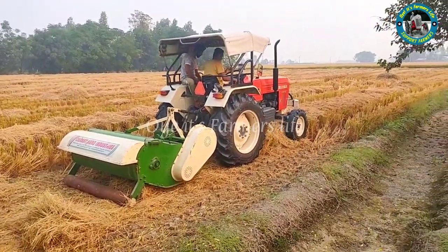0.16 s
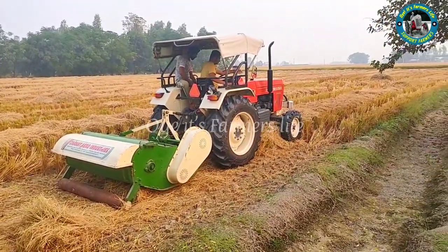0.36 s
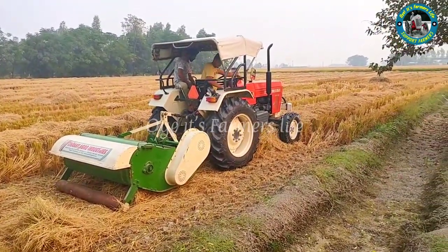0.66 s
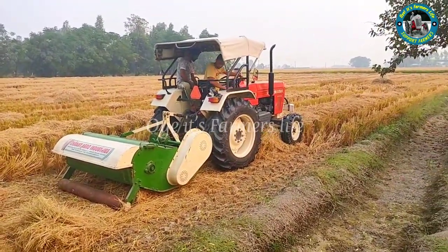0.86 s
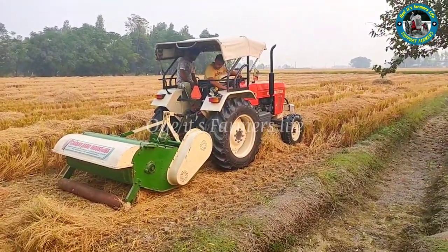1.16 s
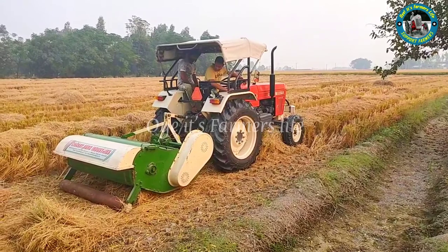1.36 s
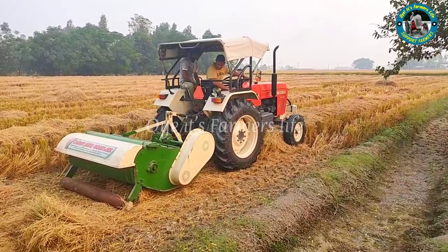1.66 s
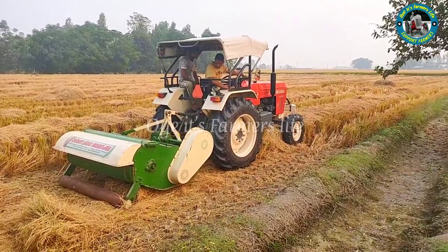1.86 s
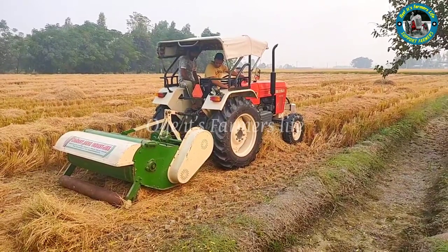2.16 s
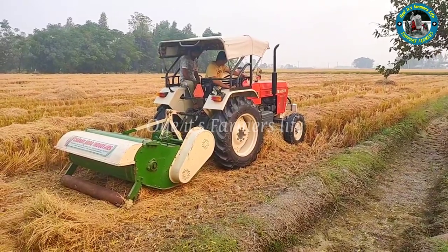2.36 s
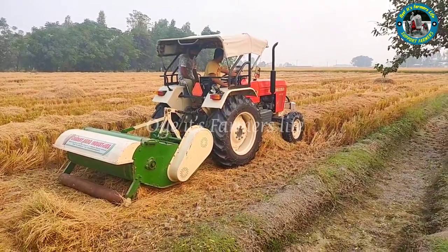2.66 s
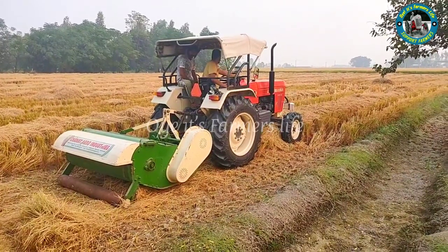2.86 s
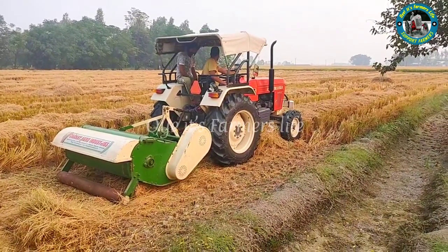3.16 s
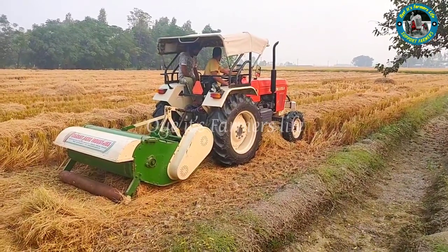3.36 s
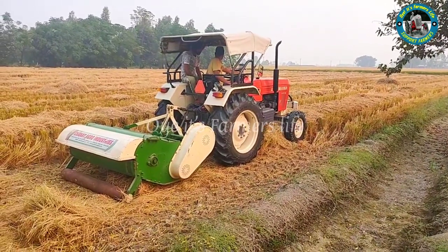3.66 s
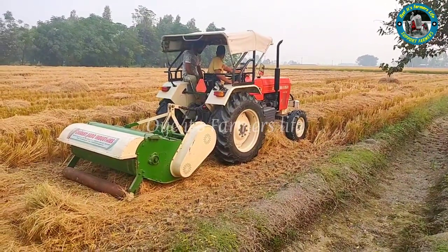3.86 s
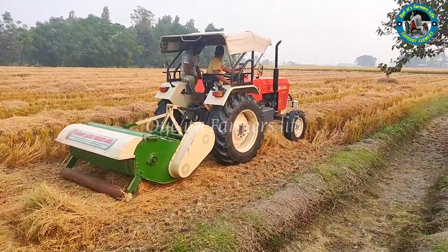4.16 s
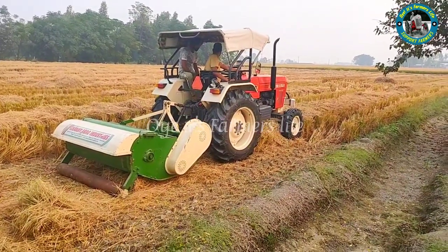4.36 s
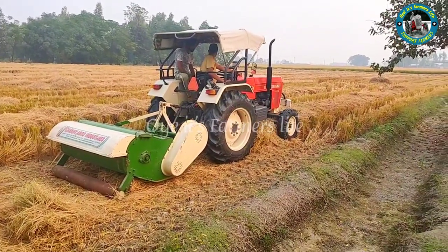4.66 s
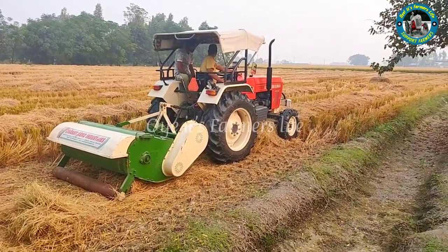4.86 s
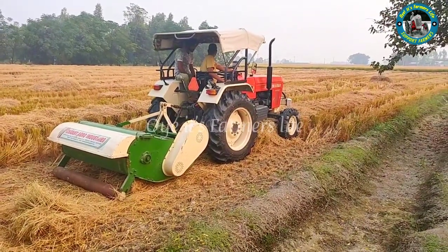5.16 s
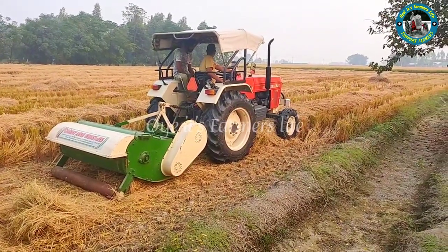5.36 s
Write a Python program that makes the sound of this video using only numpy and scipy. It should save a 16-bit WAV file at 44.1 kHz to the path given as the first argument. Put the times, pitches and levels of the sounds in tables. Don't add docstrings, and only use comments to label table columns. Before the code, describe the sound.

From 0 to 1.25 seconds a three-cylinder diesel tractor idles in an open field, about 17 chugs a second, lumpy and fairly quiet, with woody metallic block knocks, gritty hiss and low gear rumble; a faint tin tick at 0.66 and a brief fuller push near 0.95. A small low click at 1.28 marks a cut. At 1.35 the throttle is stabbed: thumps swell, the exhaust rasps, tin chatters until 1.55, and the rate jumps to about 25 a second, easing slightly by 2.1. At 2.2 a second, softer surge brings the sharpest bright rattle and a couple of clanks, reaching about 31. From 2.6 to 4.3 it drones steadily around 30, with fan hum dipping near 3.9 and sparse faint rattles. From 4.4 to 4.8 it climbs to about 34, booming deeper, then holds until 5.5, stopping mid-drone. Dry, close stereo, muffled above 8 kHz.

```python
import sys
import numpy as np
from scipy import signal
from scipy.fft import rfft, irfft
from scipy.io import wavfile
from scipy.ndimage import uniform_filter1d

SR = 44100
rng = np.random.default_rng(int(sys.argv[2]) if len(sys.argv) > 2 else 0)


def put_to_file(sound):
    columns = np.atleast_2d(sound).T
    safe = np.clip(columns, -1, 1)
    whole_steps = np.round(safe * 32767)
    wavfile.write(sys.argv[1], SR, whole_steps.astype(np.int16))


def undo_db(level):
    steps = np.asarray(level, float) / 20
    return 10 ** steps


N = 242796
T = np.arange(N) / SR

# time_s, firing_rate_hz
SPEED = [(0.0, 16.91), (0.78, 16.72), (1.22, 17.71), (1.36, 19.71), (1.5, 24.02), (1.57, 25.4),
         (1.9, 26.54), (2.19, 26.42), (2.26, 29.59), (2.44, 31.0), (2.71, 30.42), (3.72, 30.2),
         (4.38, 30.62), (4.78, 33.84), (5.0, 33.31), (5.51, 33.27)]
# time_s, level_db
FUEL = [(0, -50), (.05, -41), (.84, -40), (.93, -34.5), (1.22, -40.5), (1.32, -41.5), (1.36, -26.5),
        (1.55, -26), (1.64, -31.5), (2.12, -35.5), (2.22, -25.5), (2.4, -28.5), (2.58, -38.5),
        (2.78, -33.5), (4.15, -32.5), (4.74, -26), (4.93, -37), (5.05, -31)]
# start_s, strength (0-1)
STABS = [
    (1.345, 1),
    (2.217, 0.64),
]
# centre_hz, width_hz, level_db
STACK_MODES = [(60, 55, 1.5), (80.2, 34, 0), (117.9, 20, -8), (149.3, 27.6, -6.5), (316, 71, -12)]
THUMP_CYLINDER_DB = [0.3, 1, -1]
# firing_rate_hz, level_db
PIPE_BOOM = [(17, 2.5), (26, -3), (30.5, -3.5), (33.5, 3.5)]
# frequency_hz, density_db
RASP = [(200, -26.0), (500, 5), (1200, 8.5), (1500, -5.0), (3000, -13), (4300, -18), (5000, -25),
        (7300, -8.5), (8300, -46.0)]
# centre_hz, width_hz, cylinder_1_db, cylinder_2_db, cylinder_3_db
BLOCK_MODES = [(673.6, 81, -10.5, 1.5, 2), (965.5, 42.8, -9, 6.5, -7), (1206.3, 66, -22, 0.5, 0),
               (1616, 81, -23.5, -24, -12), (2638, 150, -22, -19, -17), (3660, 84, -21.5, -14, -17),
               (4400, 250, -35, -37.5, -27)]
GAS_CYLINDER_DB = [-4, 3, -1]
# frequency_hz, density_db
GAS_SPECTRUM = [(760, -42.5), (1300, -4), (1430, -15), (1570, -0.5), (2100, -7), (2570, -7), (3000, -11.5),
                (3680, -6.5), (4000, -11.5), (4750, -12.5), (7330, -11.5), (7920, -25), (8110, -51),
                (8300, -64.5), (10800, -89), (18300, -120)]
# multiple_of_firing_rate, level_db (at 30 firings/s), slope_db (per decade of speed)
INTAKE_TONES = [(1, -35, 50), (2, -52, -24)]
# centre_s, half_length_s, level_db
BELT_LULLS = [
    (2.104, 0.2, -6.5),
    (3.91, .3, -10),
]
# frequency_hz, density_db
GEAR_SPECTRUM = [(59, -12), (100, -9), (150, -9.5), (200, -9.5), (231, -12.5), (336, -7.5), (451, -16.5),
                 (649, -11.5), (777, -13.5), (964, -15.5), (1100, -20), (1220, -20.5), (1400, -32),
                 (1500, -23), (1950, -70.5), (3300, -120)]
# peak_s, peak_db, pitch_hz
RATTLES = [(0.6617, -38, 7170), (1.349, -32, 6310), (1.4007, -36, 6600), (1.4407, -42, 7150),
           (1.487, -38.5, 7300), (1.5276, -37, 7000), (1.887, -40, 6850), (2.1508, -43, 7140),
           (2.2202, -23, 7140), (2.2894, -35, 7140), (3.1093, -48, 7300), (3.3075, -41, 6950),
           (3.903, -41, 6570), (4.3973, -44, 6840)]
# centre_hz, width_hz, level_db
TIN_MODES = [(5650, 250, -14), (6100, 150, -15), (6700, 200, -2), (6900, 90, -2), (7300, 200, -4)]
# start_s, peak_db, pitch_hz
CLANKS = [(0.6624, -47, 4100), (1.4496, -39, 4180), (1.6197, -49, 3650), (1.6566, -48, 3650),
          (1.849, -51, 3500), (1.884, -49, 3700), (1.9294, -48, 3660), (2.286, -36, 3300),
          (2.319, -37, 3420), (2.4199, -59, 3720), (3.2445, -45, 3720), (3.3438, -42, 3660)]
# frequency_hz, density_db
RUMBLE_SPECTRUM = [(15, -16), (25, -8), (50, 7.5), (80, -8), (130, -36), (300, -66.5)]
# frequency_hz, level_db
SCATTER = [(60, -62.5), (125, -25.5), (250, -20), (500, -2.5), (1000, -7), (2000, 6.5), (4000, 0.5),
           (6000, 10.5), (7500, 2)]
# frequency_hz, phase_rad
PORT_PHASE = [(40, 0), (780, -.1), (1290, -1), (1550, -4.6), (2240, -11.2), (4220, -12.3), (4570, -13.9),
              (5600, -23.2), (8100, -25.1)]
# frequency_hz, level_db
PORT_DB = [(180, 0), (310, 1.5), (520, -.5), (900, .8), (1550, 1), (2670, 2.3), (4590, 2), (7900, 1.4)]

KNOCK_LAW = -43, 0.39, 2, -1
GAS_LAW = -50.5, 0.24, 6, 10
FAN_LAW = -41, 0, 18, -3
GEAR_LAW = -38.5, 0.2933, 3, 3
CRUISE_DB, CRUISE_HZ = -33, 30
THUMP_LEAD, KNOCK_LEAD, INTAKE_LEAD = .25, .24, .25
CUT_S, CUT_FIRINGS = 1.2822, .53


def exhaust(times, cylinder, chance, fuel_db, hz, boom_db):
    stack_lead_s = .010
    pulses = clicks(times - stack_lead_s, undo_db(np.array(THUMP_CYLINDER_DB)[cylinder] + .5 * chance))
    slow = push_pulse(pulses, .010)
    fast = push_pulse(pulses, .005)
    push = slow + np.clip((hz - 18) / 3, 0, 1) * (fast - slow)
    modes = [undo_db(db) * ring(ring(push, f, width), f, width) for f, width, db in STACK_MODES]
    thump = undo_db(boom_db) * modes[0] + sum(modes[1:])
    loud = np.sqrt(uniform_filter1d(thump ** 2, size=SR // 8) + 1e-18)
    return thump / loud * undo_db(fuel_db + 1.06)


def blast(times, fuel_db, surge):
    sizes = undo_db(2 * rng.standard_normal(len(times)))
    tear = unit(fade(clicks(times - .003, sizes), .002, .007))
    return tear * coloured(RASP) * undo_db(0.98 * (fuel_db + 25) + 7.5 * surge - 43)


def block(times, cylinder, knock_db):
    out = 0
    for hz, width, *db in BLOCK_MODES:
        blows = clicks(times, undo_db(np.array(db)[cylinder] + 1.1 * rng.standard_normal(len(times))))
        rough = .04 * fade(blows, .002, .005) * rng.standard_normal(N)
        passed = ring(blows + rough, hz, width)
        out = out + ring(passed, hz, 0.99 * width) / np.sqrt(width / 30)
    return out / np.sqrt(uniform_filter1d(out ** 2, size=SR // 2)) * undo_db(knock_db - 1.0)


def gas(times, cylinder, chance, gas_db, hz):
    puff = fade(clicks(times, undo_db(np.array(GAS_CYLINDER_DB)[cylinder] + 2.5 * chance)), .002, .009)
    place, luck = rng.random((600, 2)).T
    valves = fade(clicks(place * N / SR, undo_db(-1.5 * np.log(luck))), .0005, .003)
    rush = .9 * undo_db(-1.2 * np.maximum(gas_db + 50, 0)) * (hz / CRUISE_HZ) ** .8
    gate = rush + 0.25 * unit(puff) + 0.2 * unit(valves)
    gate = gate / np.sqrt(uniform_filter1d(gate ** 2, size=SR // 8))
    return gate * coloured(GAS_SPECTRUM) * undo_db(gas_db + 2.0)


def intake(firings, hz):
    out = 0
    for multiple, db, slope_db in INTAKE_TONES:
        level = undo_db(db + slope_db * np.log10(hz / 30))
        out = out + level * np.sqrt(2) * np.cos(2 * np.pi * multiple * (firings + INTAKE_LEAD))
    return out


def fan(firings, fan_db):
    blades_per_firing = 6.027
    lull_db = sum(db * np.exp(-((T - s) / length) ** 2) for s, length, db in BELT_LULLS)
    level = undo_db(fan_db + lull_db + 0.5 * walk(8.3))
    return level * np.sqrt(2) * np.sin(2 * np.pi * blades_per_firing * firings)


def gear(times, chance, gear_db):
    shake = unit(fade(clicks(times, undo_db(1.7 * chance)), 0.0029, 0.016))
    rough = (1.6 + 0.25 * shake) * undo_db(0.89 * walk(25)) * coloured(GEAR_SPECTRUM)
    return unit(rough) * undo_db(gear_db + 2.0)


def rattles():
    out, t = np.zeros(N), np.arange(6000) / SR
    for s, db, hz in RATTLES:
        at = int((s - .003) * SR)
        chatter = (1 - np.exp(-t / .004)) ** 2 * (np.exp(-t / .004) + .12 * np.exp(-t / .022))
        burst = rng.standard_normal(len(t)) * chatter
        sound = ring(burst, hz, 600) + sum(undo_db(d + 1.5) * ring(burst, f, w) for f, w, d in TIN_MODES)
        out[at:at + len(t)] += sound / np.abs(sound).max() * undo_db(db + 1.5)
    for s, db, hz in CLANKS:
        at = int((s - .001) * SR)
        blow = rng.standard_normal(len(t)) * np.exp(-t / .003)
        sound = ring(ring(blow, hz, 250), hz, 300)
        out[at:at + len(t)] += sound / np.abs(sound).max() * undo_db(db)
    return out


def rumble(fuel_db):
    return coloured(RUMBLE_SPECTRUM) * undo_db(.4 * fuel_db - 35)


def law(rule, fuel_db, hz, surge):
    db, per_fuel, per_octave, per_stab = rule
    return db + per_fuel * (fuel_db - CRUISE_DB) + per_octave * np.log2(hz / CRUISE_HZ) + per_stab * surge


def ports(x):
    skew = undo_db(along_hz(PORT_DB) / 2) * np.exp(1j * along_hz(PORT_PHASE) / 2)
    return irfft(rfft(x) * np.array([skew, 1 / skew]), N)


def coloured(table):
    shared, *own = rfft(rng.standard_normal((3, N)))
    apart = undo_db(along_hz(SCATTER))
    mixed = (shared + apart * np.array(own)) / np.sqrt(1 + apart ** 2)
    return unit(irfft(mixed * undo_db(along_hz(table)), N))


def along_hz(table):
    hz, value = np.transpose(table)
    return np.interp(np.log(np.fft.rfftfreq(N, 1 / SR) + 1), np.log(hz + 1), value)


def ring(x, hz, width):
    return signal.lfilter(*signal.iirpeak(hz, hz / width, fs=SR), x)


def clicks(times, sizes):
    at = np.round(times * SR).astype(int)
    inside = (at >= 0) & (at < N)
    return np.bincount(at[inside], sizes[inside], N)


def push_pulse(pulses, length_s):
    return signal.fftconvolve(pulses, np.hanning(int(length_s * SR)) / length_s)[:N]


def fade(x, rise_s, fall_s):
    t = np.arange(int(.15 * SR)) / SR
    return signal.fftconvolve(x, (1 - np.exp(-t / rise_s)) * np.exp(-t / fall_s))[:N]


def walk(rate):
    k = int(SR / rate)
    held = np.repeat(rng.standard_normal(N // k + 1), k)
    return unit(uniform_filter1d(held, k)[:N])


def unit(x):
    return x / np.sqrt(np.mean(x ** 2))


def scene():
    hz = np.interp(T, *np.transpose(SPEED))
    firings = .03 + np.cumsum(hz) / SR + CUT_FIRINGS * (T > CUT_S)
    count = np.arange(int(firings[-1]) + 2)
    cylinder = count % 3
    thumps = np.interp(count - THUMP_LEAD, firings, T, left=-1, right=N)
    knocks = np.interp(count - KNOCK_LEAD, firings, T, left=-1, right=N)
    chance = rng.standard_normal((3, len(count)))

    fuel_db = np.interp(T, *np.transpose(FUEL))
    surge_rise_s, surge_fall_s = .005, .13
    surge = 0
    for s, strength in STABS:
        t = np.maximum(T - s, 0)
        surge = surge + strength * (1 - np.exp(-t / surge_rise_s)) * np.exp(-t / surge_fall_s)
    knock_db = law(KNOCK_LAW, fuel_db, hz, surge)
    gas_db = law(GAS_LAW, fuel_db, hz, surge)
    fan_db = law(FAN_LAW, fuel_db, hz, surge)
    gear_db = law(GEAR_LAW, fuel_db, hz, surge)
    boom_db = np.interp(hz, *np.transpose(PIPE_BOOM)) + 0.64 * np.maximum(fuel_db - CRUISE_DB, 0)

    mix = exhaust(thumps, cylinder, chance[0], fuel_db, hz, boom_db)
    mix = mix + blast(thumps, fuel_db, surge)
    mix = mix + block(knocks, cylinder, knock_db)
    mix = mix + gas(knocks, cylinder, chance[2], gas_db, hz)
    mix = mix + intake(firings, hz) + fan(firings, fan_db)
    mix = mix + gear(knocks, chance[1], gear_db)
    mix = mix + rattles() + rumble(fuel_db)
    return ports(mix)


def top_cut(x):
    return signal.sosfilt(signal.butter(12, 16000, fs=SR, output="sos"), x)


def record(dry):
    low_pass = signal.ellip(12, .2, 90, 7803, fs=SR, output="sos")
    limited = signal.sosfilt(low_pass, dry)
    step = -0.034 * (T > CUT_S) * np.exp(-np.abs(T - CUT_S) / 0.004)
    return top_cut(limited + step)


dry = scene()
out = record(dry)
put_to_file(out)
```